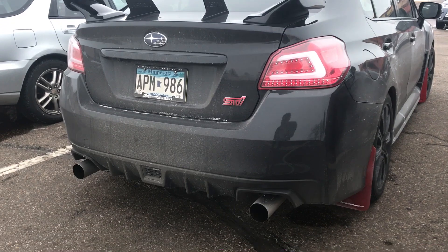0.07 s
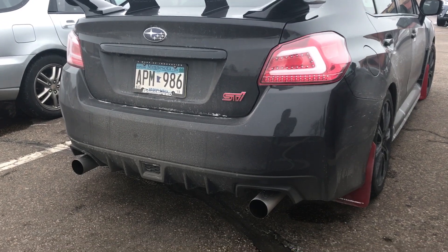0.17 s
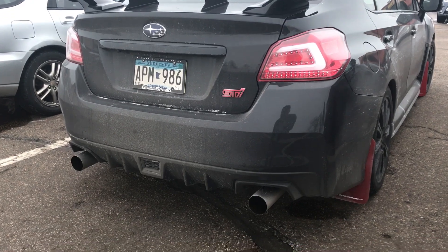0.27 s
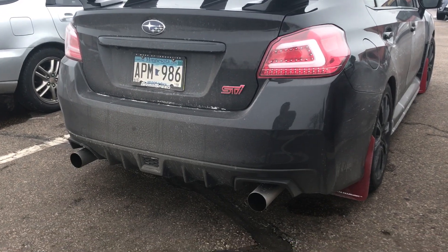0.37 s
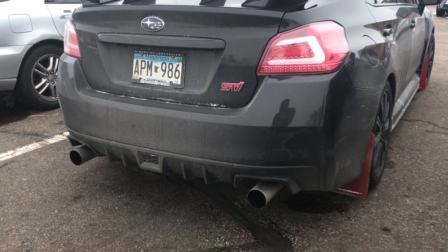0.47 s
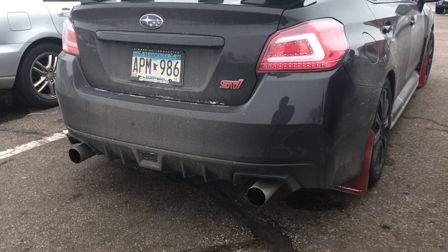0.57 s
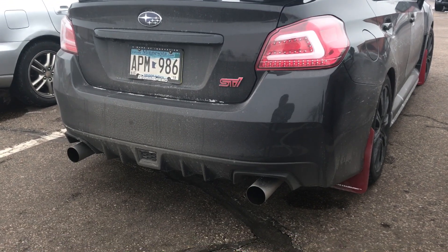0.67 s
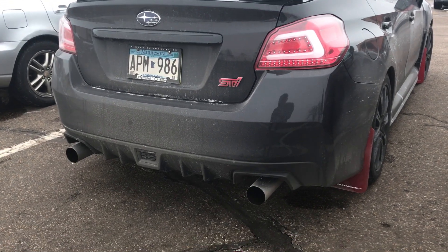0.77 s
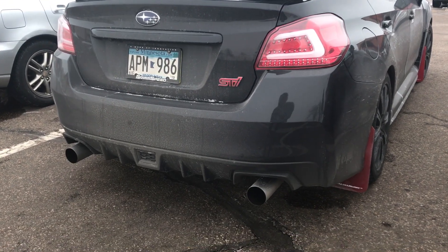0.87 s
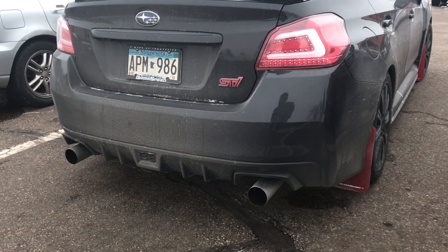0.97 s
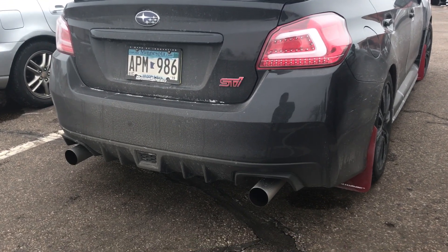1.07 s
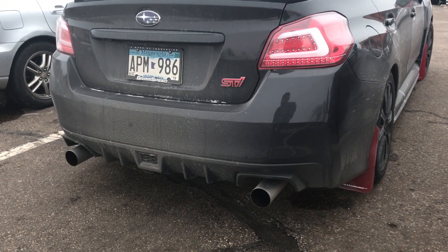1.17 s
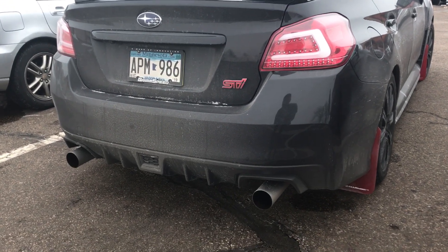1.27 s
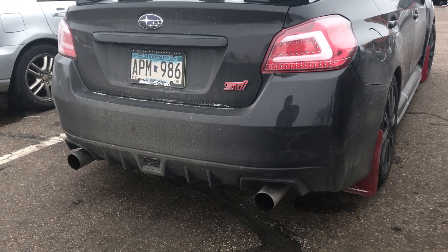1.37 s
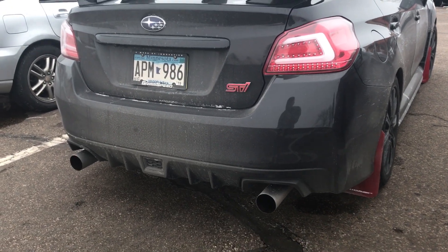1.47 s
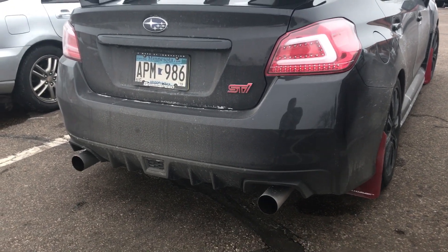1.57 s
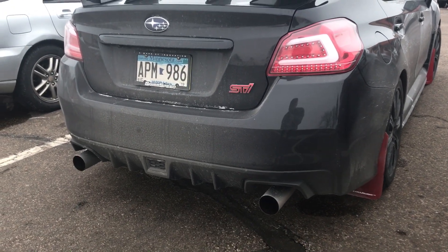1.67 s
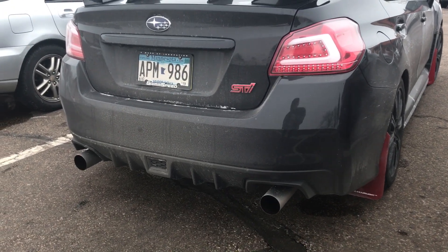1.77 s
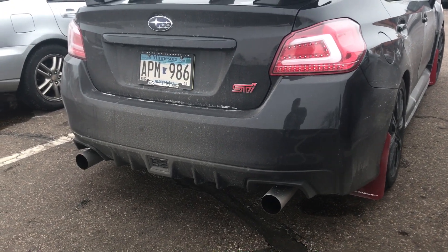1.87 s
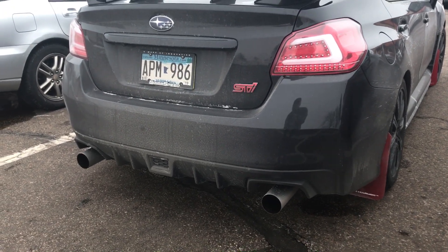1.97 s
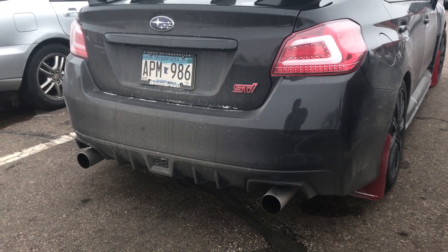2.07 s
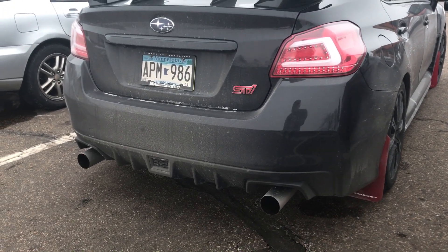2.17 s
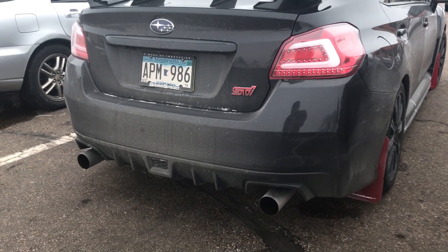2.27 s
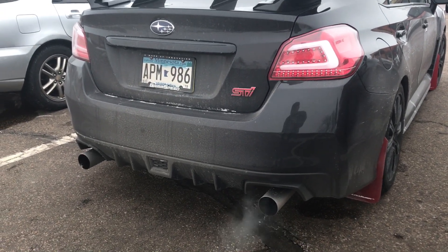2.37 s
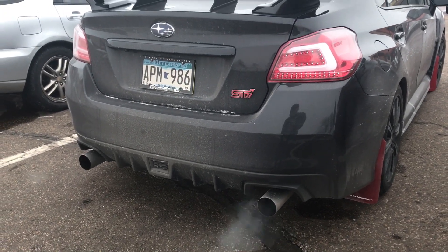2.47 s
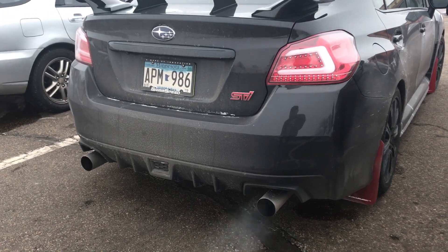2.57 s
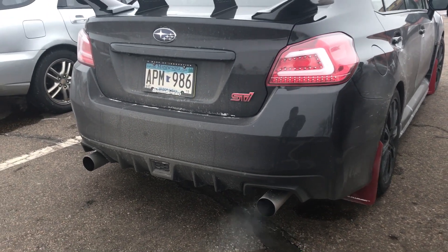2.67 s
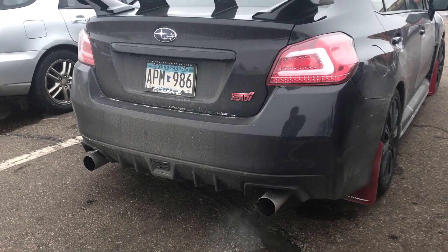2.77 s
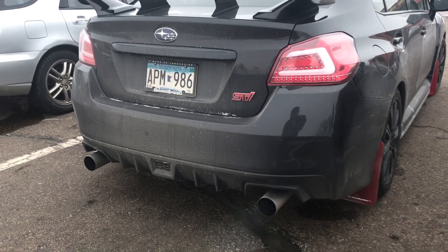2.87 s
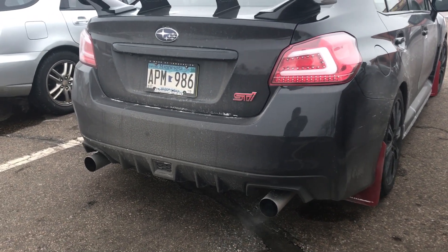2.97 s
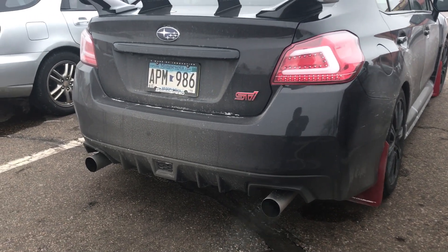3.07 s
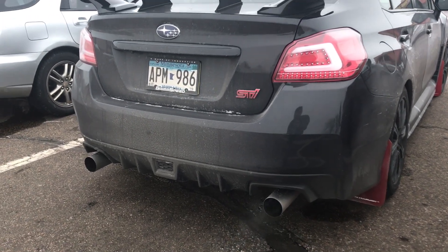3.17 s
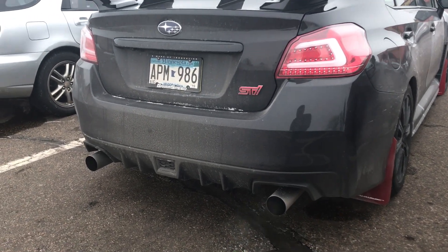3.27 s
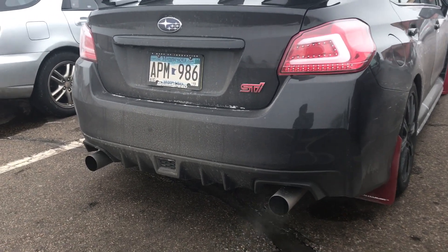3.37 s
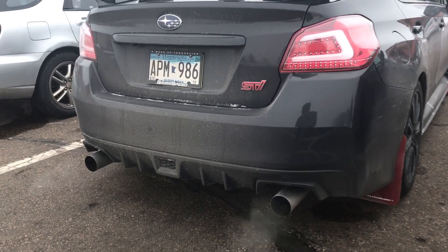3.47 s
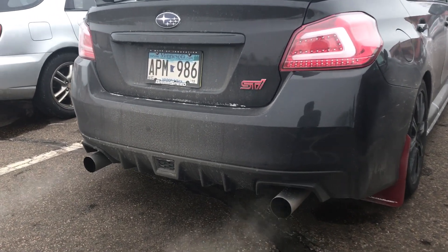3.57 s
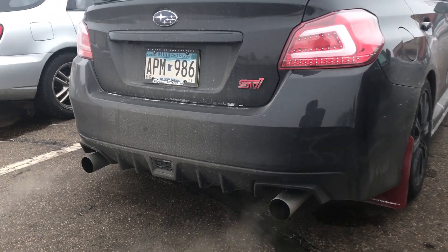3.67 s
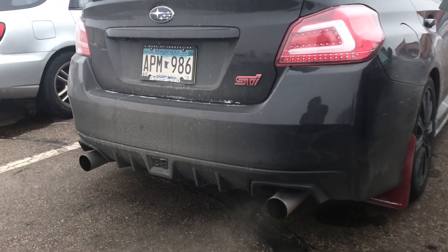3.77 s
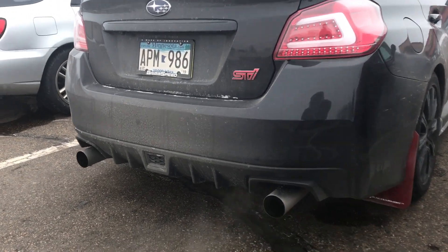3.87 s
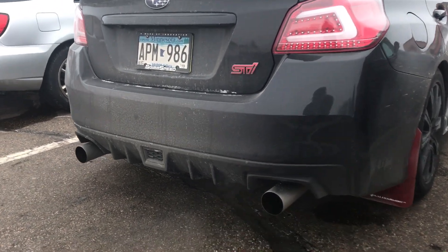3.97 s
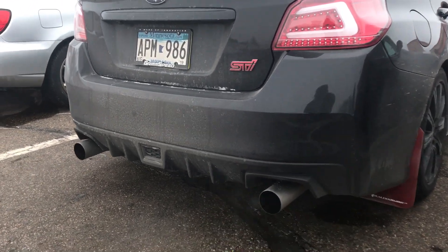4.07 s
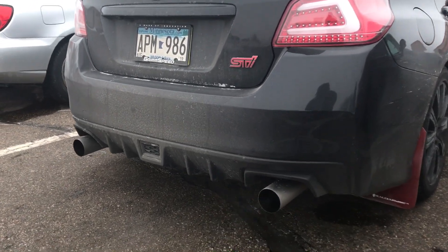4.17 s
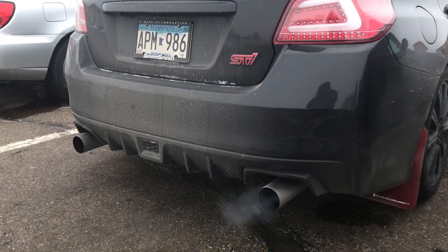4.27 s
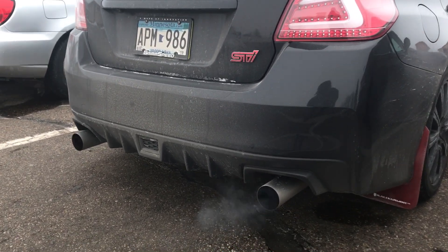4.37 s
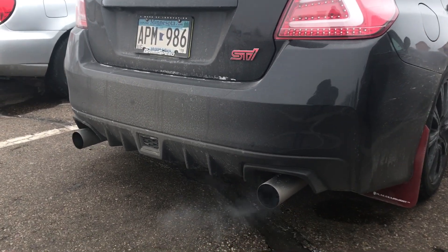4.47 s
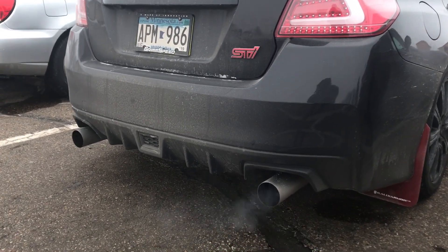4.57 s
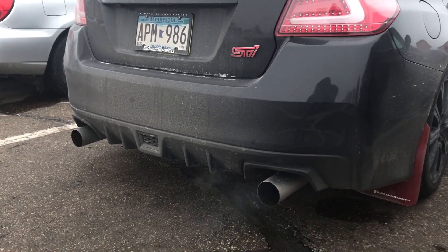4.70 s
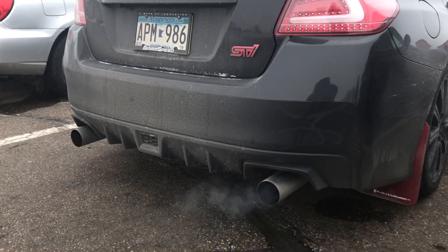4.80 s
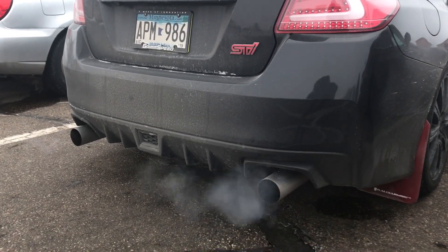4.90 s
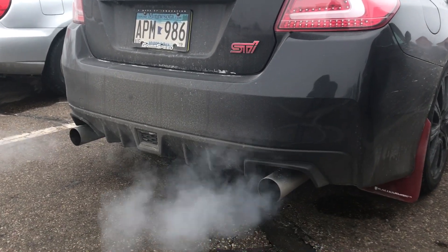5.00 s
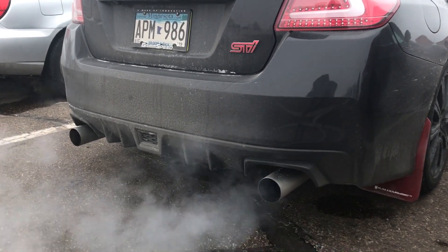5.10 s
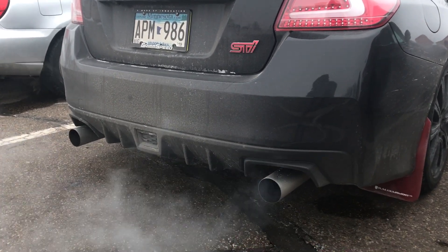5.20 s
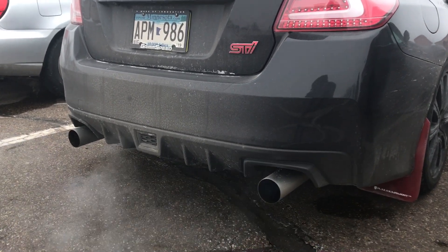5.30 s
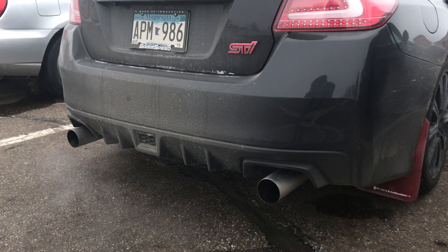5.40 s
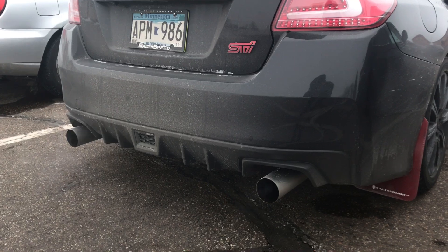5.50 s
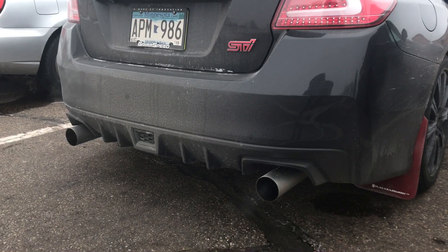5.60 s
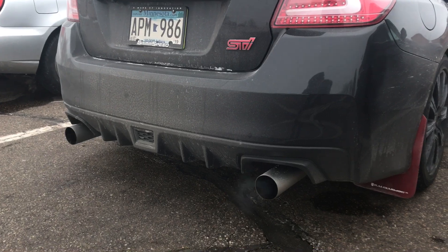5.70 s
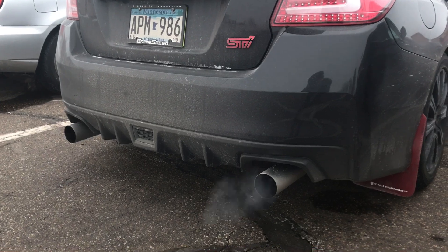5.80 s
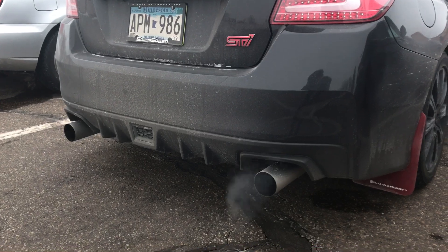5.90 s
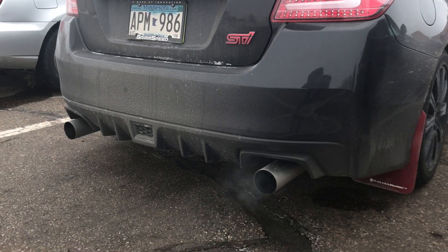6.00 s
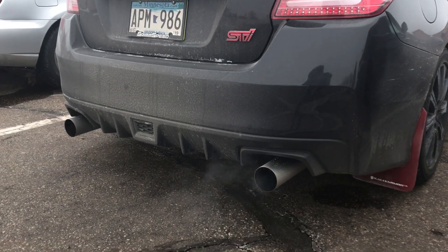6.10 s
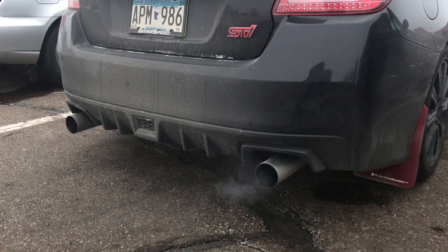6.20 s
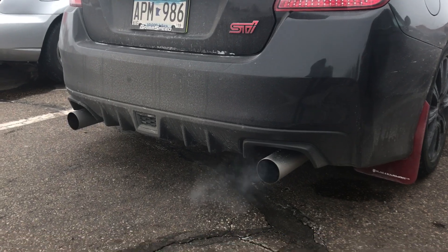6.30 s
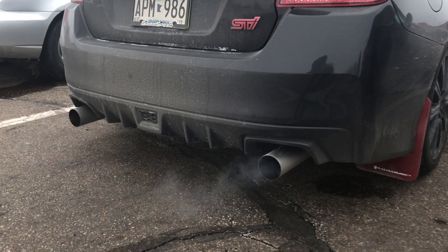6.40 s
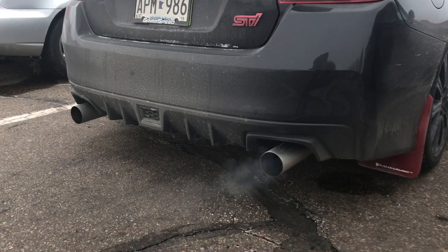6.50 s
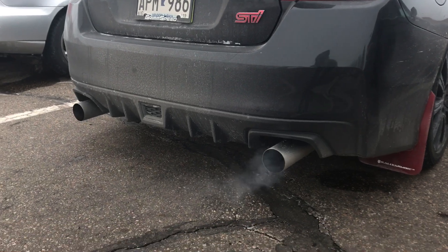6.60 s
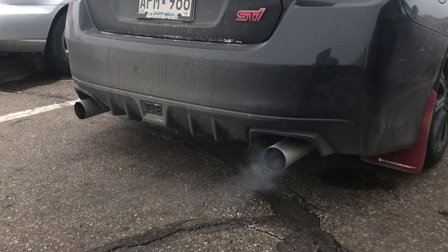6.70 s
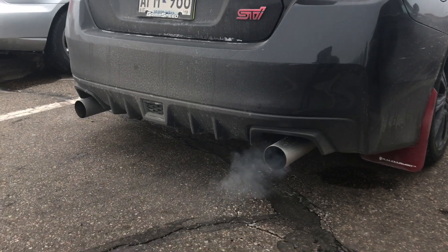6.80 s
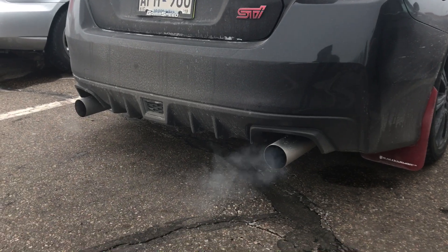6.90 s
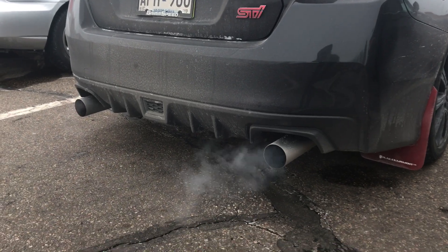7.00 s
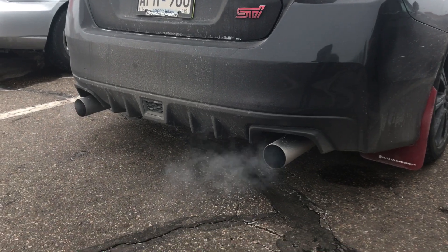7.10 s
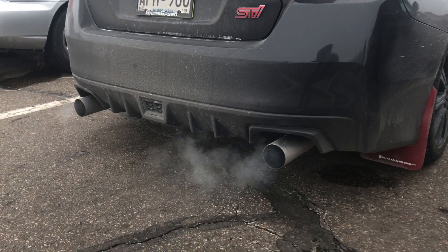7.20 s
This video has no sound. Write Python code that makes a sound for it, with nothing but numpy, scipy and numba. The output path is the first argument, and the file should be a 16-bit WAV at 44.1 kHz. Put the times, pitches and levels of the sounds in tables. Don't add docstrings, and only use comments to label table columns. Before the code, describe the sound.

In an open parking lot, a turbocharged flat-four with a loud exhaust idles with a deep, uneven thrum. A gentle throttle blip comes first, then a strong one, then two full stabs, each roaring up and falling back with pops, crackles and faint metallic ticking. The phone begins behind the car and moves close to the tailpipe, so the sound grows bassier and fuller. It settles into a lumpy idle.

```python
import sys
import numpy as np
from scipy import signal
from scipy.io import wavfile
from scipy.ndimage import uniform_filter1d
from numba import njit

SR = 44100
rng = np.random.default_rng(int(sys.argv[2]) if len(sys.argv) > 2 else 0)


def inscribe(sig):
    pcm = np.round(np.clip(np.atleast_2d(sig).T, -1, 1) * 32767)
    wavfile.write(sys.argv[1], SR, pcm.astype(np.int16))


def voltage_ratio(level):
    return 10 ** (np.asarray(level, float) / 20)


N = 319725
TIME = np.arange(N) / SR

# [time_s, firing_rate_hz]
ENGINE_SPEED = [(0.0, 39.71), (0.601, 35.62), (0.889, 56.22), (1.095, 57.02), (1.817, 43.37),
                (2.261, 38.63), (2.576, 71.82), (2.776, 72.66), (3.533, 46.43), (3.799, 89.18),
                (4.207, 70.04), (4.984, 44.71), (5.247, 92.63), (5.714, 70.58), (6.264, 51.63),
                (6.738, 41.56), (7.01, 37.95), (7.25, 35.12)]
START_TURN = 0.46
FLYWHEEL_S = 0.12
# [size_db, header_delay_ms, short_header_share (0-1)]
CYLINDERS = [(1.5, -8.5, 1), (7.5, -8.5, 0), (5.5, -8.5, 0.02), (2.9, -9.5, 1)]
BLOWDOWN_HZ = 520

# [pitch_hz, width_hz, far_level_db, near_level_db, short_header_share (signed), first_swing (sign)]
BOOM_MODES = [(60.8, 31, 0.5, 2, 2, 1), (102.9, 22.6, 6.5, 5.5, 0.06, -1), (123.5, 44.8, 3, -3.5, 0.6, -1),
              (144.5, 27.6, -1.8, -3, 4, -1), (164.9, 30, -4, -7.5, 5, -1), (192.1, 33.6, -15.5, -14, 3, 1)]
RING_MODES = [(222, 21.6, -12.5, -45, 7, -1), (247.4, 41, -2, -13, -1.5, 1), (278.4, 51.7, -1.5, -18, 3, 1),
              (303.5, 33, -19.5, -2.2, 3.5, -1), (331.5, 20, -27.5, -5, 1.2, 1),
              (367.1, 20, -41.5, -10, 5.5, -1)]
RASP_MODES = [(384, 68, -2.5, 3, 2.2, -1), (436, 42, 0.5, -1.5, 2.2, 1), (506.4, 60, 4, 0.5, 2.17, -1),
              (613, 102, 1, -2, 0.92, 1), (857.6, 177, 3, -4.5, 1.96, -1), (1039, 115, -1.5, -10.5, 1.4, 1),
              (1258, 490, -3, -8.5, 1.52, -1)]
# [firing_rate_hz, level_db]
COLUMN_RESPONSE = [(36, -20), (42, -25), (50, -19), (57, -17), (66, -14.5), (73, -16), (80, -18.5),
                   (90, -21)]

# [start_s, opening_s, open_length_s, throttle (0-1)]
BLIPS = [
    (.62, 0.075, 0.25, 0.41),
    (2.2, 0.13, 0.25, 0.91),
    (3.46, .11, 0.22, 1),
    (4.918, 0.079, 0.21, 1.0),
    (5.33, 0.079, 0.084, 0.33),
]
# [start_s, length_s, extra_scatter_db]
BURBLES = [
    (2.97, .6, 2),
    (4.4, .5, 3),
    (5.9, .55, 2.2),
]
BURBLE_RAMP_S = 0.12
STEADY_SCATTER_DB, THROTTLE_SCATTER_DB = 0.65, 0.9
# [time_s, level_db]
BURN = [(0, -0.2), (1.0, -0.6), (1.5, 0), (2.15, -1.5), (2.7, -5.5), (3.0, 0.5), (3.35, 0), (3.8, -3),
        (4.1, 1.5), (4.4, 0.1), (4.65, -3.5), (4.85, -1), (5.5, -3), (5.9, -1), (6.3, 0), (6.5, 0.5),
        (6.8, 1.7), (7.25, 2.5)]
GOVERNOR_HZ, GOVERNOR_SPAN_HZ = 48.6, 11.2

# [coasting_db, full_throttle_gain_db, release_s, slope_db (per 10 firings/s),
# idle_valve_db, close_db, misfire_db (per dB of scatter)]
BOOM_LAW = (-19.5, 15, 0.26, 0.76, 3.5, -1.1, 0.05)
RING_LAW = (-30, 19.5, 0.2366, 2, 7.5, -3.5, 0.2)
RASP_LAW = (-48.5, 18.5, 0.1466, 1.0, 3, 4, 0.13)
GAS_LAW = (-52.5, 12, 0.12, 0.25, 0.26, -1.48, -0.3)
THROB_LAW = (-0.24, 3, 0.32, 0.13, -5.9, -0.56, -1.5)
# [release_lag_s], [build_up (opening times)], [share_of_burn]
LAGS_S = (-.02, -.02, -.025, -.025, -.01)
SWELLS = (1.05, 1.5, 1.75, 1.75, 1.4)
BURN_SHARES = (1.15, 0.93, 0.36, 0.49, 0.27)

# [pitch_hz, density_db (per Hz)]
HISS_SPECTRUM = [(880, -30), (1500, -50), (1720, -3.5), (4270, -8), (5000, -15.5), (6260, -12.5),
                 (9260, -20), (10400, -20.5), (11900, -21), (15600, -20)]
# [pitch_hz, early_level_db, late_level_db]
WHINES = [(11510, -72.5, -74), (11690, -87, -85), (12360, -84, -95), (12877, -86, -99), (10142, -99, -84),
          (10659, -99, -85), (13580, -91, -86), (14430, -90, -87), (15120, -89, -82)]
RUMBLE_DB = -43
KNOCK_HZ, KNOCK_WIDTH_HZ, KNOCK_DB, KNOCK_LEAD_S = 865, 60, -49.5, 0.008
# [start_s, peak_level_db, pitch_hz]
FLAME_PUFFS = [(0.397, -35, 452), (0.506, -32, 541), (0.687, -31, 546), (2.262, -33, 514),
               (2.386, -22, 544), (2.546, -24, 511), (2.603, -30, 514), (3.618, -16, 649), (3.648, -9, 633),
               (3.691, -19, 622), (4.375, -30, 598), (4.523, -28, 487), (5.017, -17, 554), (5.05, -17, 511),
               (5.112, -9, 511), (5.958, -31, 560), (6.231, -33, 1250), (6.254, -34, 850),
               (6.325, -32, 560), (6.352, -25, 540)]
PUFF_RISE_MS = 4
# [start_s, ring_level_db, boom_level_db]
POPS = [(0.688, -18.5, -32), (2.386, -3.5, -23), (2.546, -16.5, -14), (2.9, -21, -23), (2.962, -13, -9),
        (3.022, -21, -17), (3.156, -11, -10.5), (3.622, 0, -31), (3.691, -17, -31), (4.519, -8, -10),
        (4.712, -40, -18), (4.789, -40, -13), (4.826, -21, -9), (5.051, -4.5, -26), (5.112, -5, -11),
        (5.95, -17.5, -14), (6.229, -11.5, -20), (6.256, -15, -34), (6.313, -15.5, -32), (6.351, -10, -25)]
# [start_s, peak_level_db]
SHIELD_TICKS = [(2.9382, -58), (3.0004, -52), (3.066, -46), (3.129, -43), (3.198, -43), (3.2715, -46),
                (3.3427, -47.5), (3.4194, -54), (3.451, -51), (4.507, -50.5), (5.9878, -56), (6.0731, -49),
                (6.146, -44.5)]
# [time_s, nearness (0 back from the car, 1 beside the tip)]
NEARNESS = [(0, 0.014), (2.2, 0.043), (3.3, 0.51), (3.95, 0.73), (4.4, .99), (6.4, 1), (7.25, .7)]


def unit(x):
    return x / np.sqrt(np.mean(x ** 2))


def curves(table):
    s, *columns = np.transpose(table)
    return [np.interp(TIME, s, c) for c in columns]


def band(x, lo_hz, hi_hz, order=3):
    return signal.sosfilt(signal.butter(order, (lo_hz, hi_hz), "band", fs=SR, output="sos"), x)


def ring(x, hz, width_hz):
    return signal.lfilter(*signal.iirpeak(hz, hz / width_hz, SR), x)


def clicks(s, size):
    samples = np.clip(np.asarray(s) * SR, 0, N - 1).astype(int)
    return np.bincount(samples, size * np.ones(len(s)), N)


def fade(x, ms):
    return signal.lfilter([1], [1, -np.exp(-1000 / (ms * SR))], x)


def walk(rate):
    k = int(SR / rate)
    held = np.repeat(rng.standard_normal(N // k + 1), k)
    return 1.15 * uniform_filter1d(uniform_filter1d(held, k), k)[:N]


def rounded(x):
    return signal.sosfilt(signal.butter(4, BLOWDOWN_HZ, fs=SR, output="sos"), x)


@njit
def notch(x, hz, k):
    y, b, l = np.empty(len(x)), 0., 0.
    for i in range(len(x)):
        g = np.tan(np.pi * hz[i] / SR)
        v = (b + g * (x[i] - l)) / (1 + g * (g + k))
        y[i] = x[i] - k * v
        b, l = 2 * v - b, l + 2 * g * v
    return y


def throttle(release_s, lag_s=0, swell=1):
    opening = 0
    for s, rise, length, size in BLIPS:
        build = np.sin(np.pi / 2 * np.clip((TIME - s) / (swell * rise), 0, 1)) ** 2
        release = np.exp(-np.clip(TIME - lag_s - s - length, 0, None) / release_s)
        opening = opening + size * build * release
    return opening


def misfire():
    scatter_db = 0
    for s, length, db in BURBLES:
        from_edge_s = np.minimum(TIME - s, s + length - TIME)
        scatter_db = scatter_db + db * np.clip(from_edge_s / BURBLE_RAMP_S, 0, 1)
    return scatter_db


def idle_valve(hz):
    return np.clip((GOVERNOR_HZ - hz) / GOVERNOR_SPAN_HZ, 0, 1)


def level(law, lag_s, swell, burn_share, hz, close):
    coast_db, open_db, release_s, slope_db, idle_db, close_db, miss = law
    engine_db = coast_db + open_db * throttle(release_s, lag_s, swell) + slope_db * (hz - 55) / 10
    burn_db = miss * misfire() + burn_share * curves(BURN)[0]
    return engine_db + idle_db * idle_valve(hz) + close_db * close + burn_db


def throb(hz, turn, load_db):
    imbalance = np.clip((hz - 45) / 150, 0, .8)
    beat = 1 - imbalance * np.cos(2 * np.pi * turn / len(CYLINDERS))
    column_db = np.interp(hz, *np.transpose(COLUMN_RESPONSE))
    return np.sqrt(2) * voltage_ratio(load_db + column_db) * beat * np.cos(2 * np.pi * turn + 0.1)


def firings(hz, turn):
    k = np.arange(1, int(turn[-1]) + 1)
    size_db, delay_ms, short = np.array(CYLINDERS)[k % len(CYLINDERS)].T
    chance = rng.standard_normal((len(k), 2)).T
    s = np.interp(k, turn, TIME)
    scatter_db = STEADY_SCATTER_DB + THROTTLE_SCATTER_DB * throttle(0.089) + misfire()
    scatter_db = np.interp(s, TIME, scatter_db)
    size = voltage_ratio(size_db + scatter_db * chance[0]) / np.sqrt(np.interp(s, TIME, hz))
    s = s + (delay_ms + 0.3 * scatter_db * chance[1]) / 1000
    return clicks(s, size * (1 - short)), clicks(s, size * short)


def pipe(modes, long, short, close):
    out = 0
    for hz, width, far_db, near_db, share, sense in modes:
        drive = long + share * short
        gain = np.sign(sense) * voltage_ratio(far_db + close * (near_db - far_db))
        out = out + gain * ring(ring(drive, hz, width), hz, width)
    return out


def exhaust(hz, turn, boom_db, ring_db, rasp_db, close):
    long, short = firings(hz, turn)
    boom = pipe(BOOM_MODES, rounded(long), rounded(short), close)
    boom = notch(boom, hz, 0.39)
    tone = pipe(RING_MODES, rounded(long), rounded(short), close)
    gas = rng.standard_normal(N)
    long_puffs, short_puffs = [unit(fade(fade(x, 6.6), 8.1)) * gas for x in (long, short)]
    turbulence = unit(pipe(RASP_MODES, long_puffs + gas, short_puffs, close))
    knocks = unit(pipe(RASP_MODES, long, short, close))
    rasp = .9 * turbulence + .4 * knocks
    tips = voltage_ratio(boom_db) * unit(boom) + voltage_ratio(ring_db) * unit(tone) + voltage_ratio(rasp_db) * unit(rasp)
    return tips, unit(fade(long + short, 25))


def hiss(level_db, puffs):
    hz_points, db_points = np.transpose(HISS_SPECTRUM)
    out = 0
    for hz in 1700 * 2 ** np.arange(0, 3.3, 1 / 4):
        density_db = np.interp(np.log(hz), np.log(hz_points), db_points)
        db = density_db + 10 * np.log10(hz) + 1.2 * walk(12)
        db = db + 0.063 * np.log2(hz / 4000) * (level_db - level_db.min())
        noise = band(rng.standard_normal(N), hz / 2 ** (1 / 8), hz * 2 ** (1 / 8), order=2)
        out = out + voltage_ratio(db) * unit(noise)
    return voltage_ratio(level_db) * unit(out * (1 + 0.91 * puffs))


def whines(close):
    out = 0
    for hz, early_db, late_db in WHINES:
        db = early_db + close * (late_db - early_db) + 1.6 * walk(4.1)
        phase = 2 * np.pi * np.cumsum(hz + 9 * walk(23)) / SR
        out = out + np.sqrt(2) * voltage_ratio(db) * np.sin(phase)
    return out


def rumble():
    return voltage_ratio(RUMBLE_DB + 1.2 * walk(1.8)) * unit(band(rng.standard_normal(N), 24, 140, order=2))


def knock(hz, turn, close):
    cycle = np.arange(len(CYLINDERS) - 1, turn[-1], len(CYLINDERS))
    s = np.interp(cycle, turn, TIME) - KNOCK_LEAD_S
    blow = clicks(s, voltage_ratio(2.0 * rng.standard_normal(len(s))))
    ping = ring(ring(blow, KNOCK_HZ, KNOCK_WIDTH_HZ), KNOCK_HZ, 2 * KNOCK_WIDTH_HZ)
    return voltage_ratio(KNOCK_DB) * (1 - close) * idle_valve(hz) * unit(ping)


def flames():
    noise, out = rng.standard_normal(N), 0
    for start, db, hz in FLAME_PUFFS:
        age = np.clip(TIME - start, 0, 1) * 1000 / PUFF_RISE_MS
        puff = voltage_ratio(db) * age * np.exp(1 - age) * noise
        out = out + .45 * puff + 2.4 * ring(puff, hz, 300)
    return band(out, 400, 1500, order=4)


def pops():
    s, ring_db, boom_db = np.transpose(POPS)
    ring_blow = pipe(RING_MODES, rounded(clicks(s, voltage_ratio(ring_db - 3.5))), 0, 0.8)
    boom_blow = pipe(BOOM_MODES[2:], rounded(clicks(s, voltage_ratio(boom_db))), 0, 1)
    return 500 * (ring_blow + boom_blow)


def shield():
    s, db = np.transpose(SHIELD_TICKS)
    hit = clicks(s, voltage_ratio(db))
    metal = unit(band(rng.standard_normal(N), 6500, 15600, order=1))
    return (.9 * fade(hit, 1.5) + .4 * fade(hit, 7)) * metal


def scene():
    hz = uniform_filter1d(curves(ENGINE_SPEED)[0], int(FLYWHEEL_S * SR), mode="nearest")
    turn = START_TURN + np.cumsum(hz) / SR
    close = np.clip(curves(NEARNESS)[0], 0, 1)
    laws = (BOOM_LAW, RING_LAW, RASP_LAW, GAS_LAW, THROB_LAW)
    layers = zip(laws, LAGS_S, SWELLS, BURN_SHARES)
    boom_db, ring_db, rasp_db, gas_db, throb_db = [level(*layer, hz, close) for layer in layers]
    tips, puffs = exhaust(hz, turn, boom_db, ring_db, rasp_db, close)
    engine = throb(hz, turn, throb_db) + tips + hiss(gas_db, puffs) + whines(close)
    around = rumble() + knock(hz, turn, close)
    overrun = flames() + pops() + shield()
    return (engine + around + overrun)[None]


def low_pass(x):
    return signal.sosfilt(signal.butter(12, 15700, fs=SR, output="sos"), x)


def record(dry):
    knee = 6
    mix = dry / (1 + np.abs(dry) ** knee) ** (1 / knee)
    return low_pass(mix)


dry = scene()
out = record(dry)
inscribe(out)
```